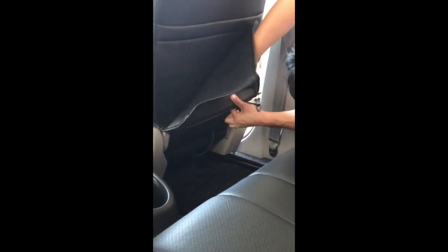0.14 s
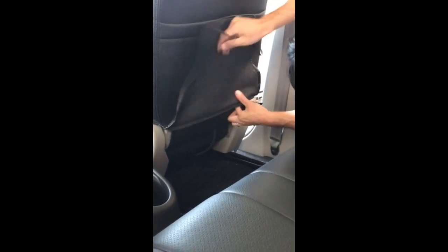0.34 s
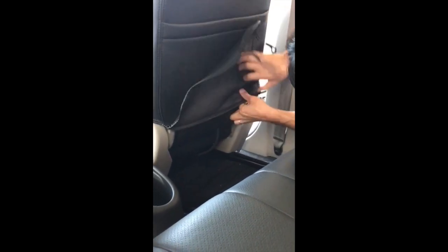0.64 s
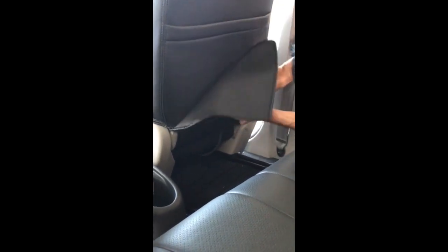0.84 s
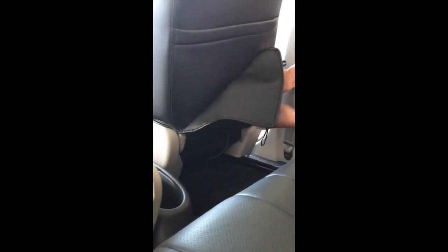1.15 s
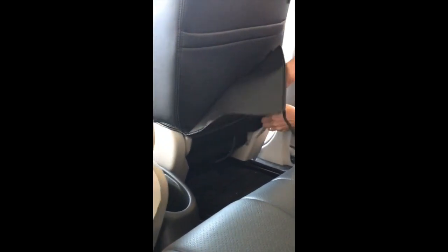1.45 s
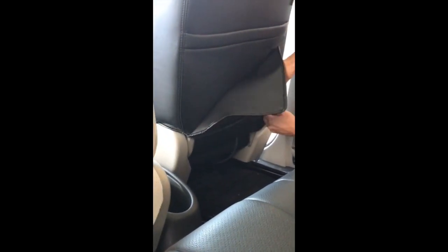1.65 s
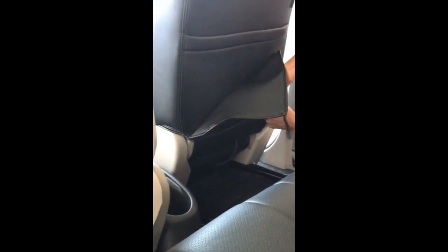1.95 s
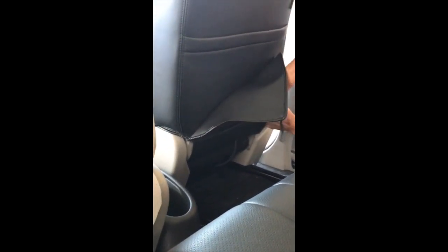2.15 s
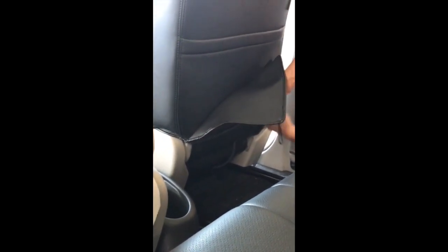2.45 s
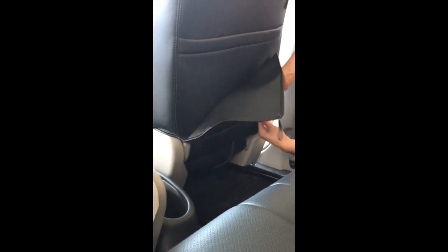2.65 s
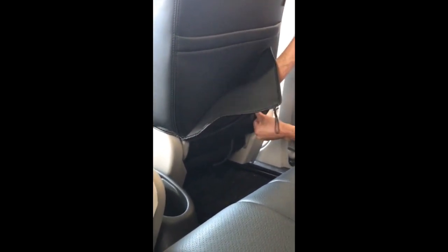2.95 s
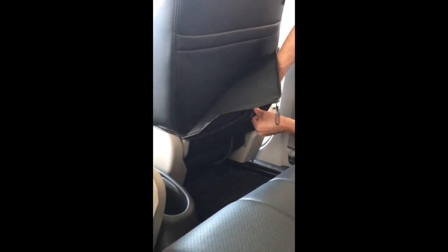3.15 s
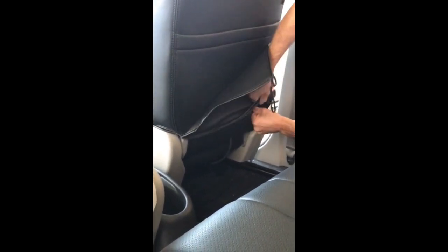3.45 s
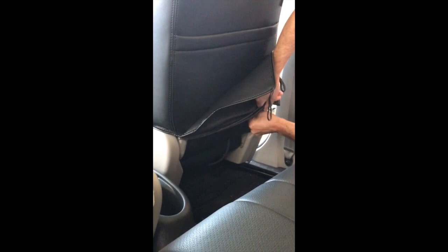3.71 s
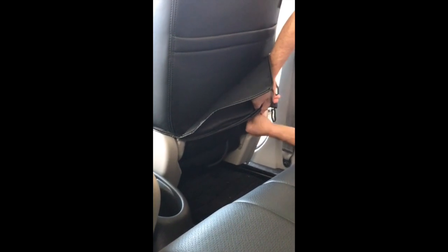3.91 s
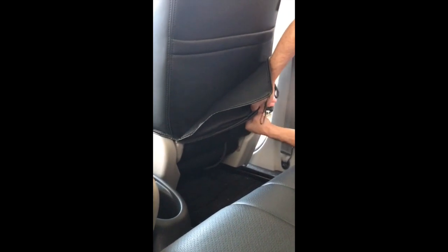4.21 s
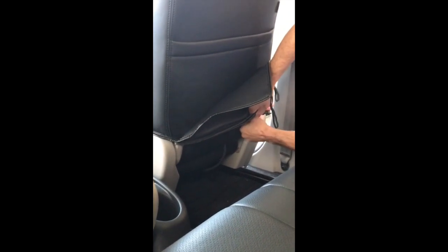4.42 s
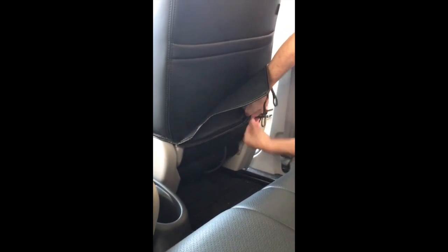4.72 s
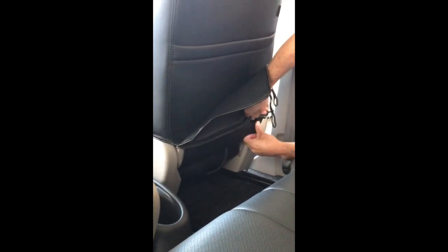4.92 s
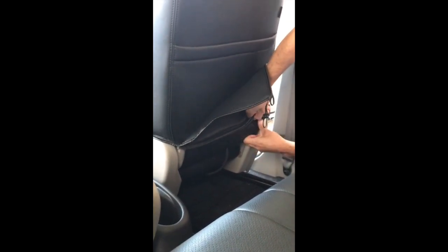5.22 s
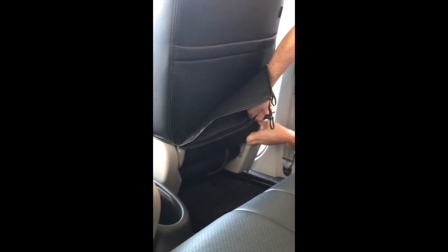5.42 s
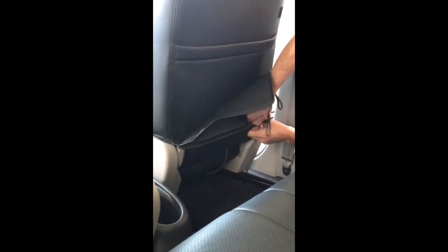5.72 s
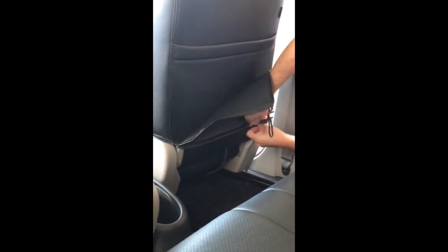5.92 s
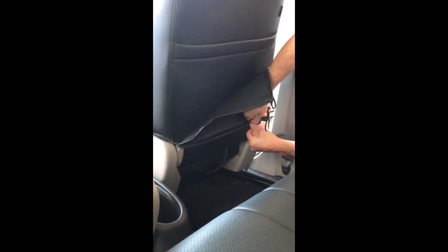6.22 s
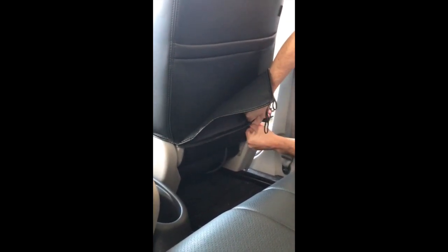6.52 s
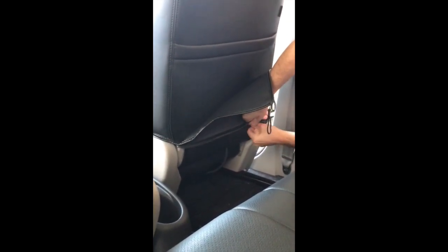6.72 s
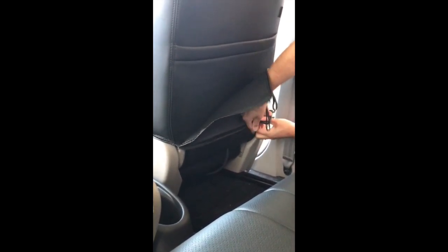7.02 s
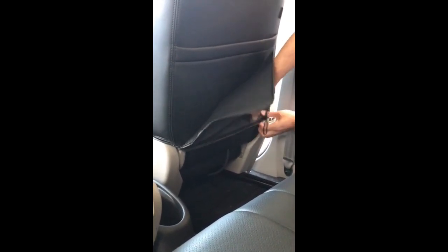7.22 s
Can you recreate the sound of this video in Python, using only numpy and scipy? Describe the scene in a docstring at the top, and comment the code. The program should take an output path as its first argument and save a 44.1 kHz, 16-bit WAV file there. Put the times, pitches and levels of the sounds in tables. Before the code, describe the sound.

Hook-and-loop strap crackles and rips open in uneven bursts under a vinyl seat flap, with soft rubbing, padded thuds and a low cabin hum.

```python
"""A steady hum and a low rumble fill the padded cabin of a parked car; at once hooks begin to snap.
Hands work a hook-and-loop strap under the vinyl flap of a seat: hooks let go one by one or in tearing
bursts (clicks through short rings), vinyl and cloth rub softly (dense noise clicks), folds scrape
(noise through one resonance) and the seat back thuds (damped sine modes). One microphone hears it all."""
import sys
import numpy as np
from scipy import signal
from scipy.fft import rfft, irfft
from scipy.io import wavfile

SR = 44100
rng = np.random.default_rng(int(sys.argv[2]) if len(sys.argv) > 2 else 0)


def digitize_waveform(pressure):
    """Quantize a signal to 16-bit integers and store it at the path in sys.argv[1].

    Rows of a 2-D input are taken as channels; values are limited to [-1, 1].
    """
    field = np.atleast_2d(pressure).T
    bounded = np.clip(field, -1, 1)
    quanta = np.round(bounded * 32767).astype(np.int16)
    wavfile.write(sys.argv[1], SR, quanta)


N = 324576

# Centres of the dull, middle and bright part of a sound, in Hz.
PART_HZ = [1300, 3860, 9100]


def from_db(db):
    """Decibels to gain."""
    return 10 ** (np.asarray(db) / 20)


def rms_one(x):
    """Scale to unit rms."""
    return x / np.sqrt(np.mean(x ** 2) + 1e-20)


def in_time(rows):
    """Columns of a curve table whose first column is seconds, one value per sample."""
    s, *columns = np.transpose(rows)
    return [np.interp(np.arange(N) / SR, s, c) for c in columns]


def spectrum_gain(spectrum, size):
    """Log frequency grid and the gain there, from rows of Hz and dB."""
    hz, db = np.transpose(spectrum)
    log_hz = np.log(np.maximum(np.fft.rfftfreq(size, 1 / SR), 1))
    return log_hz, from_db(np.interp(log_hz, np.log(hz), db))


def coloured(spectrum, size, part=None):
    """Noise of the given spectrum, or only its share around one part; rms 1."""
    log_hz, gain = spectrum_gain(spectrum, size)
    if part is not None:
        gain = gain * np.interp(log_hz, np.log(PART_HZ), np.arange(3) == part)
    return rms_one(irfft(rfft(rng.standard_normal(size)) * gain, size))


def drift(rate_hz):
    """Slow random wandering: noise through two equal one-pole low-passes at rate_hz, rms 1."""
    step = 40  # samples between computed values
    r = np.exp(-2 * np.pi * rate_hz * step / SR)
    noise = rng.standard_normal(N // step + 2002)
    slow = signal.lfilter([1], [1, -2 * r, r * r], noise)[2000:]  # drop the settling
    return np.interp(np.arange(N) / step, np.arange(len(slow)), rms_one(slow))


def resonance(x, hz, width_hz):
    """Two-pole ring, gain about 1 at its peak."""
    r = np.exp(-np.pi * width_hz / SR)
    edge = (1 - r * r) / 2
    return signal.lfilter([edge, 0, -edge], [1, -2 * r * np.cos(2 * np.pi * hz / SR), r * r], x)


def background():
    """A motor hum of slightly wandering pitch and level over lumpy rumble and hiss."""
    # Each row: time in seconds, hum pitch in Hz, middle level in dB rms.
    hum_curve = [(0.0, 90, -45.5), (0.33, 89.14, -51), (3.54, 88.36, -47), (7.36, 88.27, -50)]
    # Rumble and hiss of the cabin. Each row: frequency in Hz, relative spectral level in dB.
    cabin_spectrum = [(15, 4), (25, 0.5), (70, -0.5), (96, -6.5), (115, -2), (141, -10.5), (237, -16),
                      (488, -30), (631, -29.5), (756, -31), (1200, -32.5), (1920, -39), (5390, -60),
                      (9510, -54), (12000, -52), (15600, -83), (22000, -120)]
    cabin_db = -50
    hz, level_db = in_time(hum_curve)
    phase = 2 * np.pi * np.cumsum(hz + 0.37 * drift(1.65)) / SR
    hum = np.sqrt(2) * np.sin(phase) * from_db(level_db + 2.0 * drift(1.45))
    cabin = from_db(cabin_db + 0.22 * drift(11.0)) * coloured(cabin_spectrum, N)
    return hum + cabin


def thuds():
    """Each soft blow sets the damped modes of the padding ringing, with strengths of its own."""
    # Knuckles and folds on the padding.
    # Each row: start in seconds, strength in dB, extra strength of the upper modes in dB.
    blow_rows = [(0.051, -60, 10.5), (0.079, -68, 23), (0.28, -61.5, 16), (0.487, -59, 12),
                 (0.608, -54.5, 3), (1.03, -61.5, 17), (1.34, -45.5, -6), (1.361, -47.5, 7.5),
                 (1.82, -48.5, 3.5), (1.9, -52, 8), (2.277, -62, 16), (3.644, -37.5, -19), (3.718, -52, -1),
                 (3.873, -56.5, 10), (4.879, -57, 8.5), (4.936, -48, -5), (5.197, -55, 6), (5.614, -45, 5),
                 (5.963, -48.5, -1), (6.129, -58, 9), (6.386, -45.5, 9)]
    # Modes of the padding.
    # Each row: pitch in Hz, relative level in dB, 60 dB decay in seconds, share of the upper boost (0 to 1).
    padding = [(160, -4, 0.078, 0.027), (218.4, 2.5, 0.083, 0.22), (347, 2, 0.041, 0.17),
               (624, -3, 0.039, 0.91), (1213, -1, 0.017, 1), (1710, -3.5, 0.024, 0.22)]
    s, strength_db, upper_db = np.transpose(blow_rows)
    at = np.round(s * SR).astype(int)
    out, t = np.zeros(N), np.arange(SR // 8) / SR
    scatter_db = rng.normal(0, 1.0, (len(s), len(padding)))
    for k, (hz, level_db, t60, upper) in enumerate(padding):
        blows = np.zeros(N)
        blows[at] = from_db(strength_db + level_db + upper * upper_db + scatter_db[:, k])
        soft_onset = 1 - np.exp(-t / 0.0017)
        ring = np.sin(2 * np.pi * hz * t) * from_db(-60 * t / t60) * soft_onset
        out += signal.oaconvolve(blows, ring)[:N]
    return out


def scrapes():
    """Gritty friction swells and fades through one broad ring, passed twice."""
    # Short scrapes of a fold or fingertip.
    # Each row: middle in seconds, bell half length (sigma) in seconds, level at the middle in dB rms, ring in Hz.
    scrape_rows = [(0.284, 0.014, -58.5, 1200), (0.456, 0.019, -52.5, 4700), (.56, 0.011, -54.5, 4180),
                   (0.607, 0.024, -53, 4400), (0.86, 0.0082, -51, 1400), (1.36, 0.017, -52.5, 1140),
                   (2.952, 0.038, -53.5, 1200), (3.113, 0.021, -78, 1300), (3.64, 0.012, -50, 1360),
                   (3.755, 0.0054, -48, 1400), (4.805, 0.013, -66, 2960), (5.497, 0.012, -35.5, 3120),
                   (5.563, 0.029, -39, 2450), (6.543, 0.017, -40.5, 1600)]
    out, t = np.zeros(N), np.arange(N) / SR
    grit = rng.standard_normal(N) * from_db(1.4 * drift(58))
    for s, half, level_db, hz in scrape_rows:
        near = slice(max(round((s - .2) * SR), 0), round((s + .2) * SR))
        width_hz = 0.34 * hz
        ring = rms_one(resonance(resonance(grit[near], hz, width_hz), hz, width_hz))
        swell = np.exp(-.5 * ((t[near] - s) / half) ** 2)
        out[near] += from_db(level_db) * ring * swell
    return out


def snap_sound():
    """One release: a short crack with the spot's own ring, then the cabin's dying echoes; each part has energy 1."""
    # Flat spectrum of the crack. Each row: frequency in Hz, relative level in dB.
    flat = [(200, 0), (20000, 0)]
    snap_t60_s, tail_t60_s, tail_db = 0.016, 0.071, 0.5
    spot_ring_db, spot_width = 0.5, 0.07  # width as a share of the pitch
    t = np.arange(SR // 6) / SR
    tail = from_db(tail_db - 60 * t / tail_t60_s) * (1 - np.exp(-t / 0.0013))
    fall = from_db(-60 * t / snap_t60_s) + tail
    rings_hz = np.array(PART_HZ) * 2 ** rng.uniform(-0.66, 0.34, 3)  # a pitch of its own per part
    parts = []
    for k, hz in enumerate(rings_hz):
        crack = coloured(flat, size=len(t), part=k) * fall
        crack = crack + from_db(spot_ring_db) * resonance(crack, hz, spot_width * hz)
        parts.append(crack / np.sqrt(np.sum(crack ** 2)))
    return parts


def released(clicks, dull_db, bright_db, count=8):
    """Clicks are dealt to several spots on the strap, each with its own ring; part levels tilt the colour."""
    out, spot = np.zeros(N), rng.integers(0, count, N)
    part_clicks = [clicks * from_db(db) for db in (dull_db, 0, bright_db)]
    for k in range(count):
        for part, driven in zip(snap_sound(), part_clicks):
            out += signal.oaconvolve(driven * (spot == k), part)[:N]
    return out


def contact():
    """Strokes grip, change steadily and let go on top of the light touch; the loudest contact sets the colour."""
    # Fingers resting on and shifting over the cloth between strokes. Each row: time in seconds, level in dB.
    touch = [(0, -61), (.7, -63.5), (1.2, -63.5), (1.7, -61.5), (2.0, -71.5), (2.4, -69), (2.6, -68),
             (3.3, -62), (3.95, -73), (4.45, -68.5), (5.05, -71), (5.75, -63.5), (6.0, -69), (6.25, -62.5),
             (6.4, -70), (6.8, -67.5), (7.05, -66.5)]
    touch_dull_db, touch_bright_db = -2.5, -2.5
    # Rubs and pulls. Each row: start in seconds, length in seconds, final level in dB,
    # growth along the stroke in dB, dull part in dB, bright part in dB.
    strokes = [(0.14, 0.34, -51, 8, -11.5, -2.5), (0.532, 0.09, -54, 3.5, -9.5, 7),
               (0.824, 0.22, -61, -5.5, -4, -4), (1.27, 0.23, -60.5, -6, -3.5, 5.5),
               (2.436, .15, -69, -8, 2, 0), (2.754, .25, -48, 9, -5, 3), (3.069, 0.063, -54, -1, -4, -0.5),
               (3.493, 0.15, -38, 7, -3.5, 4), (3.708, 0.087, -52.5, -9.5, -6.5, 6),
               (4.063, 0.057, -51, 13.5, -1.5, -1.5), (4.764, 0.13, -67.5, -6.5, 1, 3.5),
               (5.181, 0.033, -63, -2, 0.5, -4), (5.382, 0.0069, -61, 3, 6, -12),
               (5.497, 0.12, -37, 0, -4.5, 0.2), (6.416, 0.041, -52, -12, -7.5, -4),
               (6.471, 0.079, -29.5, 17, -12, -9), (7.075, 0.32, -57.5, 4.5, -4, 2.8)]
    grip_db_per_s, let_go_db_per_s = 605, 456  # swell before a stroke's start, fall after its end
    t = np.arange(N) / SR
    power = from_db(2 * in_time(touch)[0])
    dull, bright = power * touch_dull_db, power * touch_bright_db
    for s, length, final_db, growth_db, dull_db, bright_db in strokes:
        level_db = final_db - growth_db * (1 - np.clip((t - s) / length, 0, 1))
        level_db -= grip_db_per_s * np.maximum(s - t, 0)
        level_db -= let_go_db_per_s * np.maximum(t - s - length, 0)
        stroke = from_db(2 * level_db)  # power
        power = power + stroke
        dull, bright = dull + stroke * dull_db, bright + stroke * bright_db
    return 10 * np.log10(power), dull / power, bright / power  # colours weighted by power


def handling():
    """A slide is countless tiny slips; a hard pull tears in fewer, uneven, clumped snaps."""
    slide_db, tear_db = -63.5, -27.5  # contact levels between which tearing takes over
    part_scatter_db = 2
    contact_db, dull_db, bright_db = contact()
    tearing = np.clip((contact_db - slide_db) / (tear_db - slide_db), .12, .9)  # share of power
    snaps_per_s = 300 * from_db(3 * drift(25))
    born = rng.random(N) < snaps_per_s / SR
    sizes = from_db(4.9 * np.minimum(rng.exponential(1, N), 3)) * rng.choice([-1, 1], N)
    slips = rng.standard_normal(N) * from_db(2.33 * drift(32))
    mix = np.sqrt(1 - tearing) * rms_one(slips) + np.sqrt(tearing) * rms_one(born * sizes)
    dull_db = dull_db + part_scatter_db * drift(15)
    bright_db = bright_db + part_scatter_db * drift(15)
    return released(mix * from_db(contact_db), dull_db, bright_db)


def snaps():
    """The releases that stand out alone, one click each."""
    # Single hooks and creases letting go.
    # Each row: start in seconds, strength in dB, dull part in dB, bright part in dB.
    snap_rows = [(0.0509, -24.5, 1.5, -20), (0.0746, -17.5, -16, -11), (0.1356, -21, 3, -11),
                 (0.8087, -23.5, -4, -1), (0.835, -19, -19, -3), (0.851, -13, -3, -5.5),
                 (0.874, -16.5, -15, -4), (0.9074, -16, -11, -2), (0.9234, -14, -4.5, -2.5),
                 (0.9495, -21.5, -1, -4), (0.972, -20.5, -5, -8), (0.9991, -21, -5, 0.5),
                 (1.2411, -31.5, 5, 2), (1.258, -23.5, 1.5, -3), (1.3151, -19, -8, -13),
                 (1.486, -33.5, -14, 4), (1.6237, -21.5, -5, 1), (1.6893, -19, -5, -1),
                 (1.7359, -24, -2, -2.5), (1.8996, -40, 15, -21), (1.9465, -31.5, -9, -5),
                 (2.1693, -37.5, 0, 6.5), (2.2741, -41.5, 12.5, -21), (2.5354, -21, -31, -8),
                 (2.5653, -19.5, -6, -2.5), (2.7018, -25, -4, 2.5), (2.7536, -17, -6.5, -2),
                 (2.8052, -24, -9, -2), (2.835, -24, 0, 0), (2.8804, -20, 0, 5.5), (2.9045, -16.5, -7, -4),
                 (2.9196, -23, -17, 7), (2.9449, -14.5, -8, -1), (2.971, -15.5, -1.5, -4),
                 (3.0079, -14.5, -5, 0.5), (3.0774, -26, -6, -5), (3.2766, -33.5, -19, 0),
                 (3.4406, -32, -7, 3), (3.488, -19.5, -30, -5), (3.5108, -20, -6, -1),
                 (3.5576, -14, -30, 9), (3.6216, -10, -6.5, 1), (3.7401, -23, 2, 10),
                 (3.7848, -25, -24, -16), (3.8342, -27, -8, 7), (3.8542, -25, -6, 6),
                 (3.8725, -23.5, 1.5, 9.5), (4.032, -39.5, 6, -19), (4.0781, -31, -0.5, -1),
                 (4.1066, -24.5, -14, -7), (4.2956, -35, -9, -2), (4.519, -29, 5.5, -1),
                 (5.242, -27.5, -3, 9.5), (5.2873, -24, -4.5, 6), (5.3343, -31, -16, -1),
                 (5.3592, -17, -14, 3.5), (5.3857, -12, -5.5, -7.5), (5.4412, -19, -7, 2.5),
                 (5.4666, -19, -4, -7), (5.4805, -24, -4, 10), (5.4957, -13.5, -7, -3),
                 (5.5242, -17, -5, 2), (5.6136, -16, -30, -14), (5.642, -15.5, -21, 1),
                 (5.7935, -21.5, -7, -5.5), (6.0194, -38, 8.5, -4), (6.1318, -30.5, -2, -21),
                 (6.1824, -24.5, -27, -10), (6.2069, -23.5, -11, -3), (6.292, -21, -33, -2),
                 (6.3507, -22.5, -18, -1.5), (6.3858, -5, -15, -5.5), (6.402, -9.5, -23, -1.5),
                 (6.4257, -8.5, -11.5, -5), (6.468, -8, -17, -7), (6.5111, -5, -13.5, -2.5),
                 (6.5222, 0, -17, -11), (6.548, -10, -34, -17), (6.614, -13.5, -11.5, -8),
                 (6.6682, -28.5, -22, -10), (6.993, -29.5, -22, -11)]
    s, strength_db, dull, bright = np.transpose(snap_rows)
    at = np.round(s * SR).astype(int)
    clicks, dull_db, bright_db = np.zeros((3, N))
    clicks[at], dull_db[at], bright_db[at] = from_db(strength_db), dull, bright
    return released(clicks, dull_db, bright_db)


def strap_body(x, size=4096):
    """The strap's colour as a causal (minimum-phase) filter, plus the rings of its backing."""
    # Colour of strap, flap and seat gap. Each row: frequency in Hz, gain in dB.
    strap_colour = [(290, -6), (500, -18), (594, -3), (775, -9), (1570, -0.5), (1990, -4), (2570, -4),
                    (2930, -8), (3220, -2.5), (3530, -8.5), (4030, -5.5), (7530, -0.5), (9570, -2),
                    (11200, -6.5), (12000, -10), (15600, -88), (22000, -120)]
    # Rings of the stiff strap backing. Each row: pitch in Hz, width in Hz, relative level in dB.
    backing = [(1200, 61, -5), (1600, 28, -25), (2495, 27, -23), (2760, 28, -15), (3470, 29, -5),
               (4015, 20, -16)]
    _, gain = spectrum_gain(strap_colour, size)
    cepstrum = irfft(np.log(gain), size)
    cepstrum[1:size // 2] *= 2  # folding the cepstrum forward makes the phase minimal
    body = irfft(np.exp(rfft(cepstrum[:size // 2], size)), size)
    rings = sum(from_db(level_db) * resonance(x, hz, width) for hz, width, level_db in backing)
    return from_db(1.5) * signal.oaconvolve(x + rings, body)[:N]


def scene():
    """Everything at one microphone."""
    strap = strap_body(handling() + snaps())
    return (background() + thuds() + scrapes() + strap)[None]


def record(dry):
    """The microphone drops the deepest bass; the top is cut steeply."""
    mic_low_hz, cutoff_hz = 30.3, 12700  # the top is 70 dB down from the cutoff on
    low_cut = signal.butter(8, mic_low_hz, "high", fs=SR, output="sos")
    top_cut = signal.cheby2(20, 70, cutoff_hz, fs=SR, output="sos")
    return signal.sosfilt(top_cut, signal.sosfilt(low_cut, dry))


dry = scene()
out = record(dry)
digitize_waveform(out)
```